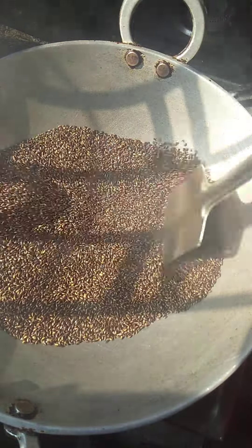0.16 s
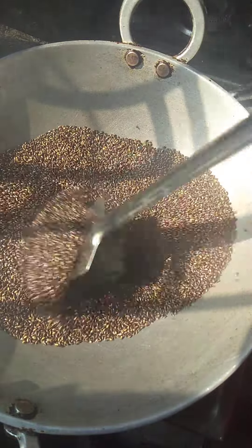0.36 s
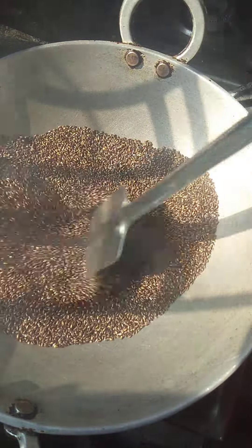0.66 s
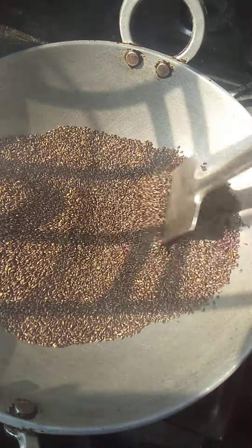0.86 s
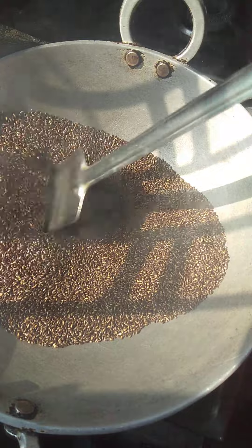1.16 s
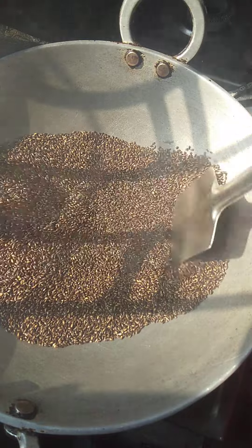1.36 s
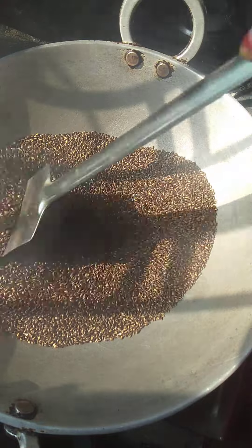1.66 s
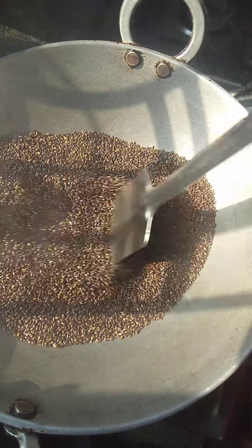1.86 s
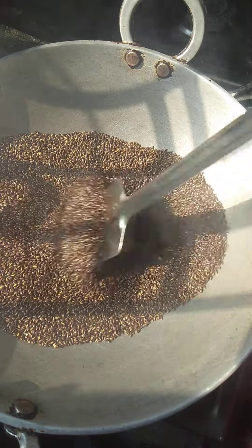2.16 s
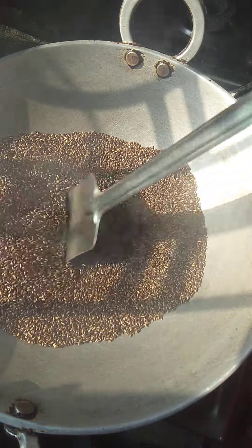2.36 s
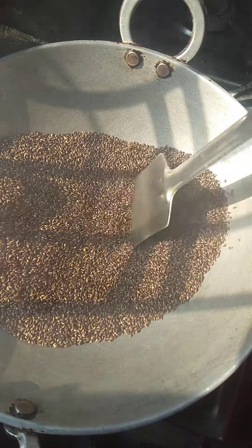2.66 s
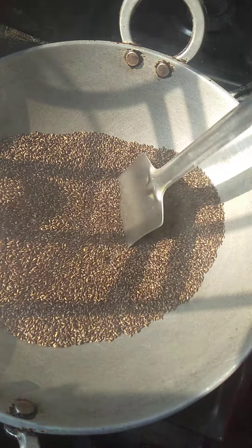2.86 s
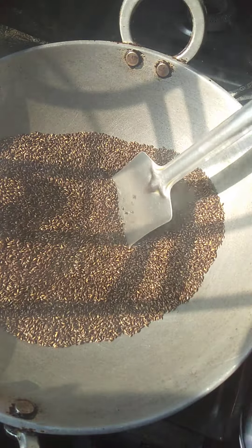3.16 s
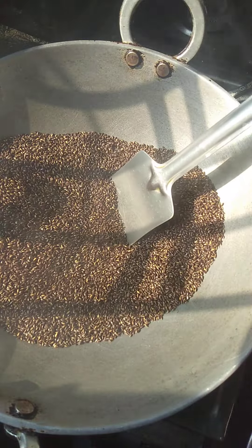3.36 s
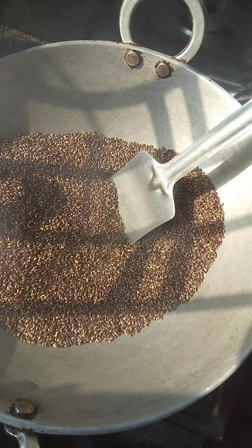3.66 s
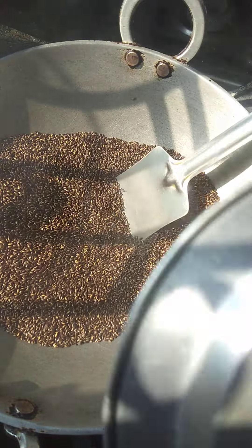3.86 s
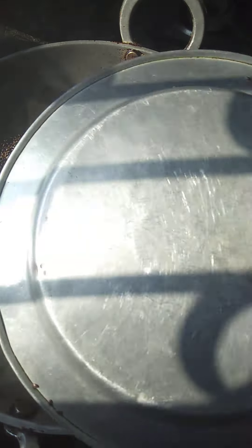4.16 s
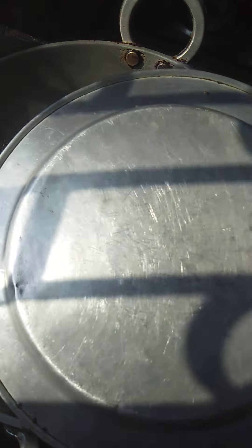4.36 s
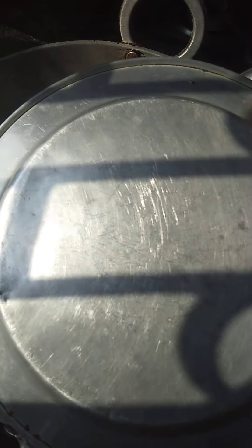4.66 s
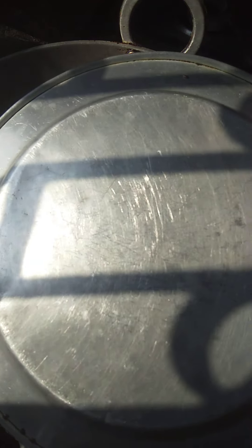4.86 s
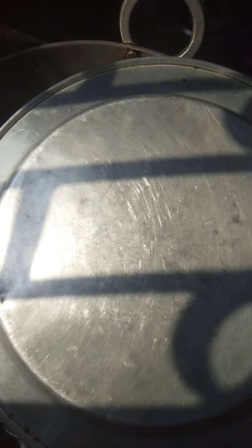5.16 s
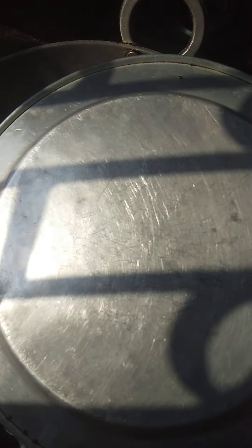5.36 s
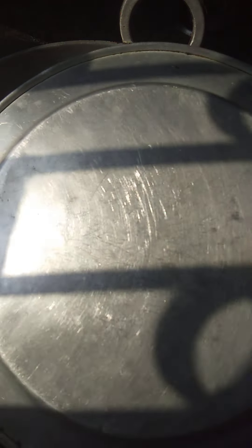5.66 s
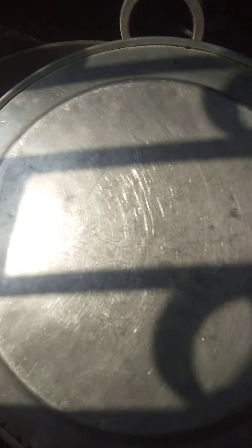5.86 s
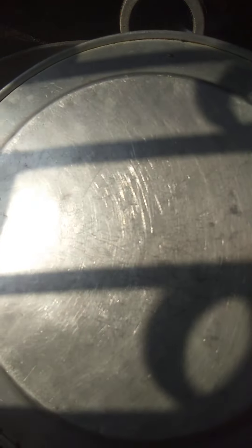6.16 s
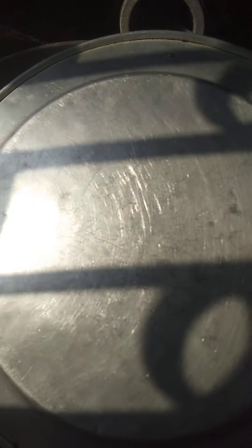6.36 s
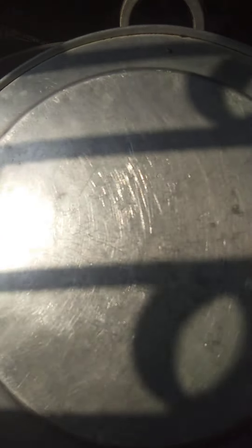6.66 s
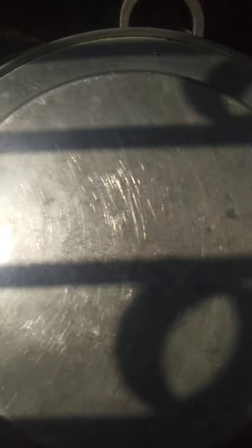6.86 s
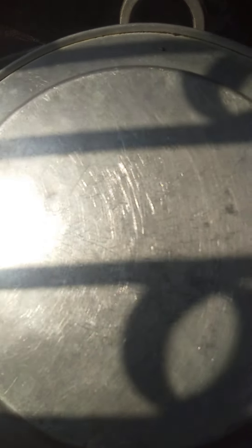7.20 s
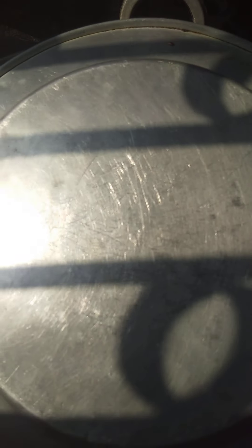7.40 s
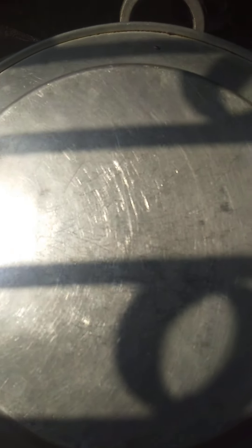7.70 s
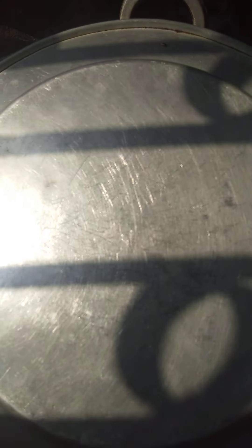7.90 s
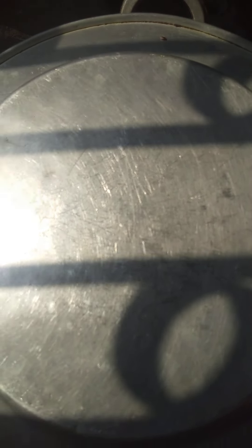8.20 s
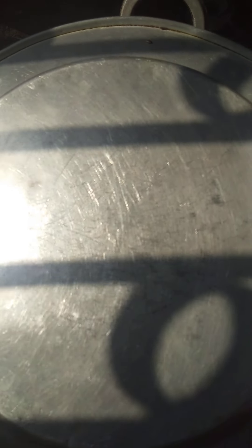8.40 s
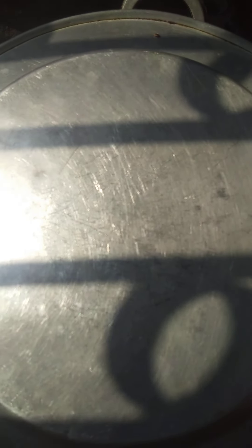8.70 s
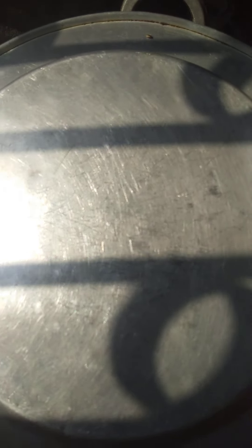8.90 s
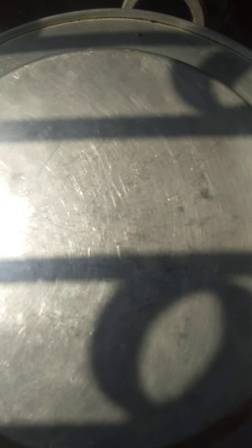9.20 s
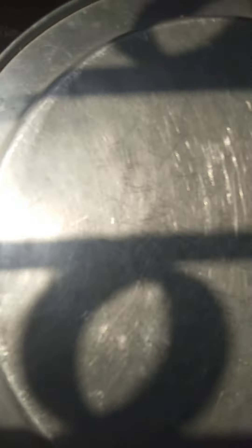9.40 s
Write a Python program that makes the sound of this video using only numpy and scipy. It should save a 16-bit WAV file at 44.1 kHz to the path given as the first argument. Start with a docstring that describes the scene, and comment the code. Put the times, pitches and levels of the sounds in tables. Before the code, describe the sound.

Seeds roast in a hot steel pan with a sputtering hiss and many sharp little pops. A metal spatula taps lightly, then scrapes across the pan with a loud knock. A loose metal lid goes on and clinks and slides on the rim several times, while the crackle continues beneath it, slightly softer and hollower. It is all heard from close by in a small, quiet kitchen.

```python
"""A sputtering sizzle, dotted with sharp ticks: flax seeds roast in a steel pan in a small, quiet kitchen.
Escaping steam hisses in short puffs, and each husk that splits sends out a brief pressure pulse.
A spatula knocks and scrapes the pan; then a loose lid clinks and slides on the rim. Impact and friction
drive the damped modes of the metal, and the space under the lid gives the crackle a hollow colour.
All is heard from close by, at the two microphone ports of a phone."""
import sys
import numpy as np
from scipy import signal
from scipy.fft import rfft, irfft, next_fast_len
from scipy.io import wavfile
from scipy.ndimage import uniform_filter1d, map_coordinates

SR = 44100
rng = np.random.default_rng(int(sys.argv[2]) if len(sys.argv) > 2 else 0)


def master_out(mix):
    """Clip the mix to full scale and print it as 16-bit PCM to the path in sys.argv[1]."""
    frames = np.transpose(np.atleast_2d(mix))
    ceiling = np.clip(frames, -1, 1)
    pcm = np.round(ceiling * 32767).astype(np.int16)
    wavfile.write(sys.argv[1], SR, pcm)


N = 420713

# steady sizzle of the seed bed: time_s, treble_db, body_db
SIZZLE_LEVELS = [(0, -48.5, -49.5), (2.2, -51.5, -56.5), (2.6, -43, -38), (3.2, -44, -40.5),
                 (3.9, -44.5, -46), (4.5, -48.5, -52), (6.4, -50, -53.5), (7, -43, -49), (8, -49, -49.5),
                 (9, -53, -49.5), (9.54, -47, -45)]
# puffs of steam: start_s, treble_db, t60_s
STEAM_PUFFS = [(0.036, -28.5, 0.086), (0.1, -22, 0.086), (0.154, -28, 0.16), (0.207, -26, 0.13),
               (0.264, -35, 0.13), (0.319, -26, 0.049), (0.343, -25.5, 0.042), (0.503, -28.5, 0.066),
               (0.547, -24.5, 0.05), (0.623, -31, 0.062), (0.68, -25.5, 0.062), (0.727, -40, 0.13),
               (0.8, -26, 0.1), (0.862, -28.5, 0.14), (0.936, -33.5, 0.25), (0.984, -24.5, 0.065),
               (1.022, -30, 0.12), (1.086, -21.5, 0.054), (1.108, -26, 0.11), (1.174, -29, 0.06),
               (1.224, -32.5, 0.16), (1.302, -27.5, 0.18), (1.332, -27.5, 0.17), (1.341, -6, 0.026),
               (1.41, -39, 0.11), (1.479, -29.5, 0.08), (1.514, -23, 0.056), (1.535, -25, 0.1),
               (1.606, -29.5, 0.16), (1.665, -27, 0.13), (1.736, -27, 0.08), (1.784, -25.5, 0.077),
               (1.818, -25.5, 0.066), (1.864, -27, 0.06), (1.929, -25, 0.066), (1.966, -21.5, 0.072),
               (1.998, -30.5, 0.1), (2.047, -31, 0.12), (2.12, -36, 0.18), (2.188, -30, 0.047),
               (2.244, -20.5, 0.036), (2.296, -22.5, 0.059), (2.326, -30.5, 0.065), (2.37, -24, 0.085),
               (2.445, -32, 0.065), (2.497, -25, 0.11), (2.546, -28.5, 0.15), (2.634, -22, 0.17),
               (2.713, -14.5, 0.051), (2.752, -29, 0.077), (2.787, -30, 0.15), (2.84, -35, 0.046),
               (2.868, -20, 0.11), (2.933, -22.5, 0.17), (3.04, -23.5, 0.057), (3.116, -19.5, 0.17),
               (3.235, -30, 0.081), (3.295, -17.5, 0.061), (3.318, -27.5, 0.2), (3.383, -30, 0.073),
               (3.437, -19, 0.1), (3.471, -26, 0.04), (3.519, -28, 0.038), (3.544, -19, 0.042),
               (3.608, -18, 0.14), (3.738, -21.5, 0.053), (3.787, -19.5, 0.1), (3.841, -21, 0.057),
               (3.874, -24.5, 0.083), (3.992, -35, 0.084), (4.037, -30.5, 0.055), (4.079, -23.5, 0.043),
               (4.134, -23, 0.063), (4.171, -28, 0.15), (4.257, -36, 0.14), (4.288, -26, 0.1),
               (4.345, -29, 0.09), (4.398, -24.5, 0.11), (4.53, -28.5, 0.061), (4.675, -34.5, 0.11),
               (4.721, -34, 0.085), (4.753, -26, 0.096), (4.79, -24.5, 0.13), (4.869, -30, 0.075),
               (4.905, -33, 0.11), (4.976, -35, 0.092), (5.055, -32, 0.37), (5.125, -34, 0.1),
               (5.221, -31, 0.07), (5.254, -31.5, 0.15), (5.316, -29.5, 0.19), (5.431, -26, 0.13),
               (5.59, -34, 0.056), (5.64, -30.5, 0.086), (5.749, -27, 0.13), (5.788, -30, 0.093),
               (5.834, -27.5, 0.15), (5.954, -37.5, 0.063), (6.033, -23.5, 0.084), (6.056, -23.5, 0.096),
               (6.082, -24, 0.074), (6.105, -32, 0.21), (6.211, -33.5, 0.079), (6.253, -28, 0.098),
               (6.312, -34.5, 0.33), (6.385, -39, 0.042), (6.451, -31, 0.2), (6.525, -30.5, 0.1),
               (6.565, -27, 0.066), (6.604, -33.5, 0.24), (6.692, -27, 0.11), (6.733, -28.5, 0.21),
               (6.798, -30, 0.11), (6.841, -37.5, 0.29), (6.935, -24.5, 0.13), (6.998, -28.5, 0.17),
               (7.062, -34.5, 0.26), (7.14, -30, 0.051), (7.217, -29, 0.12), (7.307, -25.5, 0.095),
               (7.339, -31, 0.11), (7.418, -28, 0.051), (7.461, -31.5, 0.24), (7.572, -22, 0.15),
               (7.66, -32.5, 0.18), (7.735, -27, 0.1), (7.805, -26, 0.17), (8.043, -34.5, 0.069),
               (8.088, -24.5, 0.12), (8.179, -32, 0.17), (8.226, -30.5, 0.14), (8.32, -24.5, 0.14),
               (8.397, -22.5, 0.11), (8.449, -28.5, 0.094), (8.524, -26, 0.15), (8.594, -32.5, 0.18),
               (8.751, -42.5, 0.06), (8.792, -36.5, 0.12), (8.841, -28, 0.18), (8.923, -29.5, 0.17),
               (9.015, -29.5, 0.14), (9.112, -26, 0.076), (9.15, -24, 0.17), (9.38, -19.5, 0.064),
               (9.419, -22, 0.071), (9.455, -30, 0.27)]
# spectrum of the hiss: frequency_hz, density_db
STEAM_SPECTRUM = [(350, -37), (600, -14.5), (748, -16), (1040, -25), (1640, -18.5), (1850, -10), (2870, -6),
                  (4280, -3.5), (4910, -2.5), (6200, 7), (6830, 5.5), (8500, -11.5), (13000, -2.5),
                  (15100, 2.5), (16000, -4.5)]
# balance of the hiss, left minus right: time_s, treble_db, body_db
STEAM_BALANCE = [(0.0, 8.5, 12.5), (0.6, 12, 4.5), (2.2, 10, 7), (4.2, 3, -2), (6.5, 7, 2), (7.2, 8.5, 0.5),
                 (9.54, 6, 2)]
# spectrum of the kitchen background: frequency_hz, density_db
KITCHEN_SPECTRUM = [(15, -42), (25, -37), (59, 3), (151, -0.5), (238, 5.5), (380, 7), (447, -1.5),
                    (608, -2), (897, -6), (1200, 5), (1560, -34), (2640, -120)]
# low rumble: time_s, level_db
RUMBLE_LEVELS = [(0.0, -68), (2.26, -70), (2.8, -56), (2.89, -37), (2.96, -56), (3.02, -40), (3.08, -61),
                 (3.14, -36.5), (3.3, -48), (3.59, -67), (5.55, -61), (6.27, -67.5), (6.75, -55),
                 (7.12, -58), (9.54, -64)]
# husks splitting: start_s, level_db, pitch_hz
HUSK_TICKS = [(0.0244, -20, 3900), (0.0479, -15, 6100), (0.058, -12, 4400), (0.0941, -18, 4000),
              (0.1122, -6, 2900), (0.1253, -16, 4900), (0.1341, -16, 3700), (0.1662, -11, 3800),
              (0.214, -13, 4500), (0.224, -15, 4200), (0.2348, -10, 3700), (0.2775, -15, 3800),
              (0.3236, -16, 4400), (0.3878, -22, 3600), (0.395, -18, 3700), (0.5071, -17, 4000),
              (0.443, -25, 3000), (0.5528, -18, 5700), (0.5625, -20, 3400), (0.6115, -24, 3700),
              (0.6461, -16, 3800), (0.6853, -18, 5400), (0.7973, -14, 4100), (0.8088, -15, 4500),
              (0.8185, -15, 4000), (0.8712, -12, 3800), (0.885, -14, 4400), (0.904, -15, 4000),
              (0.9438, -17, 3800), (0.9533, -17, 4200), (0.9755, -13, 3800), (0.9944, -14, 3800),
              (1.035, -14, 5200), (1.0441, -17, 3900), (1.0902, -17, 4000), (1.0965, -16, 4500),
              (1.1239, -13, 5300), (1.1449, -19, 2700), (1.2304, -18, 5100), (1.2388, -20, 3700),
              (1.3033, -12, 4300), (1.316, -12, 4700), (1.3452, -7, 4100), (1.4191, -15, 3800),
              (1.4921, -15, 4400), (1.5465, -14, 4100), (1.6166, -17, 5000), (1.6828, -16, 4900),
              (1.7471, -14, 4700), (1.7793, -18, 4900), (1.7951, -17, 4300), (1.871, -17, 5300),
              (1.9395, -8, 4000), (1.9628, -19, 3400), (1.9803, -11, 4600), (2.0131, -15, 4300),
              (2.0552, -18, 5600), (2.1282, -18, 3800), (2.1594, -17, 3900), (2.196, -15, 4300),
              (2.3091, -15, 5900), (2.3892, -11, 5400), (2.5264, -14, 4000), (2.5546, -10, 5700),
              (2.5685, -11, 3000), (2.6211, -10, 4200), (2.6343, -6, 3600), (2.6484, -6, 3900),
              (2.6667, -9, 3800), (2.7049, -10, 4300), (2.7587, -13, 4000), (2.7776, -15, 3500),
              (2.7928, -13, 3800), (2.8104, -9, 5800), (2.9483, -6, 3600), (2.9642, -6, 3600),
              (2.9814, -9, 4200), (3.0544, -11, 2600), (3.1205, -12, 3700), (3.1745, -9, 3600),
              (3.2431, -14, 4000), (3.3003, -9, 4700), (3.3215, -12, 3300), (3.329, -9, 4400),
              (3.3472, -15, 4500), (3.3889, -15, 3300), (3.4209, -20, 3800), (3.4423, -9, 5400),
              (3.4553, -9, 4500), (3.4577, -7, 5700), (3.526, -17, 4200), (3.5315, -18, 4500),
              (3.5497, -13, 3900), (3.5962, -15, 3600), (3.603, -14, 3400), (3.6292, -9, 4100),
              (3.6829, -13, 3600), (3.6957, -16, 4000), (3.7034, -10, 3700), (3.7421, -14, 4000),
              (3.7542, -17, 3700), (3.774, -17, 4400), (3.7973, -6, 5500), (3.817, -16, 4200),
              (3.8312, -11, 4200), (3.8537, -9, 4400), (3.8818, -12, 3900), (3.8889, -15, 5100),
              (3.9147, -15, 4500), (3.9391, -24, 3600), (3.9557, -20, 4400), (4.142, -14, 4200),
              (4.2908, -15, 3600), (4.3138, -14, 4500), (4.4016, -18, 4000), (4.7887, -17, 4600),
              (5.075, -17, 3600), (5.2739, -17, 3700), (5.8455, -12, 4400), (6.0399, -13, 4400),
              (6.068, -17, 4200), (6.0948, -16, 3700), (6.1008, -16, 4100), (6.1412, -21, 3800),
              (6.2226, -21, 3400), (6.3781, -18, 4000), (6.396, -21, 3800), (6.468, -20, 4000),
              (6.638, -21, 4000), (6.669, -22, 2600), (6.7029, -15, 4000), (6.9486, -13, 3900),
              (7.222, -18, 4500), (7.3112, -16, 3700), (7.5839, -18, 5200), (7.8028, -15, 3500),
              (7.907, -21, 3500), (8.3238, -14, 4700), (8.354, -17, 4500), (8.55, -17, 4200),
              (9.0631, -22, 2600), (9.2019, -12, 3900), (9.3857, -13, 5200), (9.5253, -8, 5100)]
# crackle bands of large, middling and small husks: low_hz, high_hz
HUSK_BANDS = [(1500, 6200), (2200, 6600), (3500, 5270)]
# faint low thumps as the microphone briefly overloads on loud peaks: centre_s, level_db
OVERLOAD_THUMPS = [(0.112, -41), (1.345, -41), (2.645, -42), (3.621, -41.5), (3.796, -44), (5.443, -35)]
# spatula on the pan: start_s, level_db, hardness_db, seed_damping_fraction, contact_hz
SPATULA_KNOCKS = [(0.902, -46, -10, 0.2, 3030), (0.968, -39.5, 5, 0.46, 3000), (1.715, -40.5, 3, 1, 3000),
                  (1.814, -28.5, -5.5, 0.74, 2980), (2.105, -35, 0.5, 0.68, 3000),
                  (2.407, -25.5, -6, 0.3, 3000), (2.824, -8, 5, 0.6, 2300), (2.875, -24, 1.5, 1, 1630),
                  (3.127, -15.5, 2, 0.58, 4160)]
# modes of the pan: pitch_hz, gain_db, base_t60_s
PAN_MODES = [(99, -28, 0.4), (165.4, -18, 1), (259, -10, 1), (339, 8.5, 0.15), (436, 8, 0.27),
             (446.5, 11, 0.07), (488, -1.5, 0.93), (575, -6, 0.3), (695, -23, 0.63), (881, 3, 0.36),
             (1027, 9, 0.088), (1225, 3, 0.048), (1560, -4.5, 0.23), (1690, -4, 0.11), (1830, -13, 0.18),
             (1970, -1, 0.06), (2407, -6.5, 0.15), (3070, -2, 0.079), (3660, -11, 0.16)]
# spatula dragged over the pan, one list a stroke: time_s, level_db, brightness_db
SPATULA_STROKES = [
    [(0.93, -69, -10), (0.97, -39.5, -12), (1.06, -61, -15)],
    [(1.8, -50, -20), (1.83, -45.5, -20), (1.93, -56, -20)],
    [(2.39, -55, -19), (2.415, -34.5, -16), (2.6, -30.5, -14), (2.8, -39.5, -12), (2.84, -35.5, 9),
     (3.1, -34.5, -5.5), (3.135, -36, -2), (3.35, -46.5, 0)],
]
# spectrum of the blade's rasp: frequency_hz, density_db
RASP_SPECTRUM = [(150, -53), (220, -4.5), (330, 6.5), (450, 1.5), (600, -3.5), (800, -5.5), (1050, -7),
                 (1400, -10.5), (2600, -66)]
# rough notes of the sliding blade, later the lid, one list a note: time_s, level_db, pitch_hz
METAL_GLIDES = [
    [(2.5, -40, 800), (2.78, -35, 518)],
    [(2.84, -40, 2200), (3.1, -44, 1700)],
    [(8.85, -54, 1620), (9.06, -54, 1520)],
    [(9.19, -54, 1530), (9.32, -55, 1760)],
]
# modes of the lid and the air under it: pitch_hz, gain_db, t60_s
CAVITY_MODES = [(638, -1, 0.024), (1100, -8, 0.02), (1368, -0.5, 0.022), (1537, -12, 0.048),
                (2333, -11.5, 0.035)]
# lid on the rim: start_s, level_db, hardness_db, hand_damping_fraction, contact_hz
LID_CLINKS = [(4.25, -41, 2, 0.8, 3600), (4.3547, -27, -0.5, 0.52, 1500), (4.5353, -26, -0.5, 0.1, 1490),
              (4.561, -18, -4.5, 0.4, 1050), (4.786, -39, -10, 0.4, 3600), (4.952, -29.5, 0, 0, 3630),
              (4.967, -22.5, -5.5, 0.43, 900), (5.332, -41, -5, 0.4, 3600), (5.4422, -16, 1.5, 0.86, 3680),
              (5.458, -26, 4, 0.85, 3560), (5.545, -26, -4, 0.3, 2380), (5.594, -28.5, -3.5, 0.95, 2320),
              (6.7672, -17, 3, 0.77, 3590), (6.791, -20.5, -2, 0.82, 2440), (6.877, -21.5, 2, 0.46, 3830),
              (6.9179, -21, 3, 0.64, 2340), (7.729, -31.5, 7, 1, 2680), (8.0935, -33, 10, 0.93, 1380),
              (8.188, -36.5, -12, 0.4, 2500), (8.4085, -23, 9, 1, 6450), (9.162, -35.5, 0, 0.47, 2400)]
# modes of the lid: pitch_hz, gain_db, base_t60_s
LID_MODES = [(219.5, -5.5, 0.37), (257.4, -1.5, 0.22), (306, 10.5, 0.068), (404.6, 8.5, 0.17),
             (449, 10.5, 0.09), (600, -5, 0.26), (893, 14, 0.3), (1040, 7, 0.2), (1096, -14.5, 0.12),
             (1360, -5, 0.19), (1630, -7.5, 0.096), (2300, -8.5, 0.024), (2934, -9, 0.041),
             (3590, -10, 0.025), (3770, -9, 0.02), (4100, -9, .02), (6190, -14.5, 0.087)]
# lid settling and sliding on the rim, one list a stroke: time_s, level_db, brightness_db
LID_STROKES = [
    [(4.55, -46, -13), (5.068, -50, -9), (5.2, -55, -8)],
    [(5.46, -36, -4), (5.48, -48.5, -24), (5.8, -48.5, -23)],
    [(6.78, -49, 13), (6.952, -39.5, -25), (7.15, -62, 0)],
    [(8.78, -74, 16), (8.86, -69, 16), (9.04, -69, 16), (9.1, -78, 16), (9.22, -70, 16), (9.33, -72, 14)],
]
# delay at the left port, which is further from the pan: time_s, lag_samples
LEFT_PORT_LAG = [(0, 4.1), (4, 5.84), (5, 13.7), (9.54, 13.9)]

PUFF_LEAD_S, PUFF_RISE_S, PUFF_SQUARENESS = 0.0085, 0.019, 2.5  # a puff starts before it stands out
BODY_DB, BODY_DB_PER_DB = -38.5, 0.8  # body of a -31.5 dB puff, and its growth with the treble
BODY_LATE_S = 0.0015  # the body of the hiss follows the first thin jet
TICK_DECAY_CYCLES, TICK_PAN_DB, TICK_LAG_S = 1.1, 3, .00005  # seeds lie all over: pan and lag scatter
CRACKLES_PER_S, CRACKLE_SCATTER_DB, CRACKLE_DB = 120, 4.5, -5  # in each husk band
MODE_SHIFT_PER_KHZ, MODE_SCATTER_DB = .003, 2.5  # each contact point shifts and weights the modes anew
LID_ON_S, LID_SHADE_DB, CAVITY_DB = 3.95, -2, -27
TAPS_PER_S, TAP_GAIN = 90, 0.69  # seeds thrown against the lid


def undb(db):
    """Amplitude ratio of a level in decibels."""
    return 10 ** (np.asarray(db) / 20)


def unit(x):
    """Normalisation to an RMS of one."""
    return x / np.sqrt(np.mean(x ** 2))


def curve(table):
    """Linear interpolation of each column in time."""
    times, *columns = np.transpose(table)
    return [np.interp(np.arange(N) / SR, times, column) for column in columns]


def band(x, lo_hz, hi_hz):
    """Band-pass filtering between two edges."""
    edges_hz = [lo_hz, min(hi_hz, .45 * SR)]
    return signal.sosfilt(signal.butter(2, edges_hz, "band", fs=SR, output="sos"), x)


def coloured(spectrum, lo_hz=0., hi_hz=np.inf):
    """Spectral shaping of white noise between two soft edges."""
    size = next_fast_len(N + N % 2, True)
    f = np.arange(1, size // 2 + 2) * SR / size
    hz, db = np.transpose(spectrum)
    shape = undb(np.interp(np.log(f), np.log(hz), db))
    edges = 1 / (1 + (lo_hz / f) ** 12) / (1 + (f / hi_hz) ** 12)
    return unit(irfft(rfft(rng.standard_normal(size)) * shape * edges, size)[:N])


def flicker(rate_hz):
    """Random modulation: Gaussian values joined by ramps."""
    hold = int(SR / rate_hz)
    return uniform_filter1d(np.repeat(rng.standard_normal(N // hold + 1), hold), hold)[:N]


def add(out, start_s, sound, pan_db=0.):
    """Superposition of a short signal on both rows; positive pan is to the left."""
    i = int(start_s * SR)
    n = min(sound.shape[-1], N - i)
    out[:, i:i + n] += sound[..., :n] * undb([[pan_db / 2], [-pan_db / 2]])


def ring(force, modes, tilt_db_per_octave=0.):
    """Forced vibration: each mode responds as a damped two-pole resonator."""
    out = 0
    for hz, db, t60 in modes:
        radius, angle = np.exp(-np.log(1000) / (t60 * SR)), 2 * np.pi * hz / SR
        response = signal.lfilter([.5, 0, -.5], [1, -2 * radius * np.cos(angle), radius ** 2], force)
        out = out + undb(db + tilt_db_per_octave * np.log2(hz / 500)) * response
    return out


def steam_envelopes():
    """Incoherent sources add in power: bed and puffs sum to the amplitudes of treble and body."""
    power = undb(2 * (np.array(curve(SIZZLE_LEVELS)) + 3 * flicker(12)))
    t = np.arange(SR // 3) / SR
    late_s = np.array([[0], [BODY_LATE_S]])
    swell = np.sin(np.pi / 2 * np.clip((t - late_s) / (PUFF_RISE_S - late_s), 0, 1)) ** 4
    for start_s, treble_db, t60 in STEAM_PUFFS:
        puff = swell * undb(-120 * (t / t60) ** PUFF_SQUARENESS)
        body_db = BODY_DB + BODY_DB_PER_DB * (treble_db + 31.5)
        add(power, start_s - PUFF_LEAD_S, puff * undb([[treble_db], [body_db]]) ** 2)
    return np.sqrt(power)


def steam_hiss(treble, body):
    """Jet noise: the steam sputters, and as each jet has its own colour, bands swell independently."""
    def jets(bands, pan_db):
        out = 0
        for lo_hz, hi_hz, power_share in bands:
            swell = undb(2.5 * flicker(44.33)) * np.sqrt(power_share)
            out = out + swell * np.array([coloured(STEAM_SPECTRUM, lo_hz, hi_hz) for _ in range(2)])
        return unit(out) * undb([pan_db / 2, -pan_db / 2])

    treble_pan_db, body_pan_db = curve(STEAM_BALANCE)
    treble_bands = [(8330, 14760, 0.32), (12700, np.inf, 0.67)]
    body_bands = [(0, 3500, 0.13), (3340, 5080, 0.59), (4970, 6770, 0.44)]
    high = treble * undb(2.2 * flicker(260)) * jets(treble_bands, treble_pan_db)
    return high + body * undb(4.2 * flicker(250)) * jets(body_bands, body_pan_db)


def kitchen(floor_db=-64.5):
    """Partly coherent background: a wavering floor and a rumble, mostly alike at both ports."""
    def independent_pair(lo_hz, hi_hz=np.inf):
        return np.array([coloured(KITCHEN_SPECTRUM, lo_hz, hi_hz) for _ in range(2)])

    floor = coloured(KITCHEN_SPECTRUM, 220) + .5 * independent_pair(104)
    rumble = coloured(KITCHEN_SPECTRUM, 72, 188) + .25 * independent_pair(20, 180)
    floor *= undb(floor_db + 3 * flicker(28))
    return floor + undb(curve(RUMBLE_LEVELS)[0] + 2.3 * flicker(13)) * rumble


def splitting_husks(body):
    """Sudden release: a husk radiates a pulse of a cycle or two; fainter crackle follows the steam."""
    ticks = np.zeros((2, N))
    for start_s, db, hz in HUSK_TICKS:
        pan, lag = rng.standard_normal(2)
        delay_s = np.maximum(TICK_LAG_S * lag * np.array([[1], [-1]]), 0)
        t = np.maximum(np.arange(SR // 200) / SR - delay_s, 0)
        pulse = -np.sin(2 * np.pi * hz * t) * np.exp(-t * hz / TICK_DECAY_CYCLES)
        add(ticks, start_s, undb(db) * pulse, TICK_PAN_DB * pan)
    sizes = undb(CRACKLE_SCATTER_DB * np.minimum(rng.exponential(size=N), 3)) * rng.choice([-1, 1], N)
    crackle = 0
    for lo_hz, hi_hz in HUSK_BANDS:
        splits = rng.random(N) < CRACKLES_PER_S / SR
        crackle = crackle + unit(band(splits * sizes, lo_hz, hi_hz))
    return 1.15 * band(ticks, 1200, 11000) + undb(CRACKLE_DB) * body * crackle


def overload_thumps(pulse_s=.004):
    """Brief microphone overload leaves a faint low thump: a one-sided pulse at each listed time."""
    out = np.zeros((2, N))
    for centre_s, db in OVERLOAD_THUMPS:
        add(out, centre_s - pulse_s / 2, undb(db) * np.hanning(int(pulse_s * SR)), pan_db=-4)
    return out


def metal_impacts(blows, modes):
    """Impact excitation: a blow and its rattle ring the modes; hardness brightens, damping shortens."""
    out, t = np.zeros((2, N)), np.arange(SR // 3) / SR
    for start_s, db, hardness_db, damping, contact_hz in blows:
        hardness_db = np.clip(hardness_db, -9, 9)
        struck_modes = []
        for hz, gain_db, t60 in modes:
            shift, weight = rng.standard_normal(2)
            shifted_hz = hz * (1 + MODE_SHIFT_PER_KHZ * shift * hz / 1000)
            struck_modes.append((shifted_hz, gain_db + MODE_SCATTER_DB * weight, t60 * (1.1 - damping)))
        force = rng.standard_normal(len(t)) * (np.exp(-t / 0.0029) + 0.2 * np.exp(-t / 0.064))
        force[0] = 14  # sharp first contact, ahead of the rattle
        ringing = ring(force, struck_modes, hardness_db)
        ringing /= np.abs(band(ringing, 200, 1200)).max()
        bite = ring(rng.standard_normal(len(t)) * np.exp(-t / 0.002), [(contact_hz, 0, .006)])
        bite /= np.abs(bite).max()
        add(out, start_s, undb(db) * (ringing + undb(hardness_db + 1) * bite))
    return out


def gate(stroke, ramp_s):
    """Trapezoidal envelope over the span of a stroke."""
    t = np.arange(N) / SR
    return np.clip(np.minimum(t - stroke[0][0], stroke[-1][0] - t) / ramp_s, 0, 1)


def drag(strokes, low, high):
    """Friction sounds only during motion; brightness weights its upper part."""
    out = np.zeros(N)
    for stroke in strokes:
        db, brightness_db = curve(stroke)
        out += gate(stroke, ramp_s=0.013) * undb(db) * (unit(low) + undb(brightness_db) * unit(high))
    return out


def spatula_scrape(slips, grit):
    """Stick-slip friction: the blade rasps and drives the damped modes of the pan."""
    pan_low = ring(grit, [(hz, db, .3 * t60) for hz, db, t60 in PAN_MODES if hz < 1100])
    pan_high = ring(grit, [(hz, db, .2 * t60) for hz, db, t60 in PAN_MODES if hz > 1100])
    rasp = slips * coloured(RASP_SPECTRUM, 150, 2600)
    return drag(SPATULA_STROKES, unit(rasp) + 0.78 * unit(pan_low), pan_high)


def metal_glides(width_hz=220):
    """Narrow-band noise about a moving pitch: the rough note of sliding metal."""
    out = np.zeros(N)
    for stroke in METAL_GLIDES:
        db, hz = curve(stroke)
        phase = 2 * np.pi * np.cumsum(hz) / SR
        note = flicker(width_hz) * np.cos(phase) + flicker(width_hz) * np.sin(phase)
        out += gate(stroke, ramp_s=0.022) * undb(db) * note
    return out


def lid_cavity(drive):
    """Cavity resonance: the hand-held lid shifts, so each hollow note comes and goes."""
    return sum(ring(undb(4.5 * flicker(14)) * drive, [mode]) for mode in CAVITY_MODES)


def seeds_under_lid(crackle, hiss, body):
    """Shielding and resonance: once on, the lid shades the crackle and rings with it, hiss and taps."""
    taps = unit((rng.random(N) < TAPS_PER_S / SR) * rng.standard_normal(N))
    covered = np.arange(N) / SR > LID_ON_S
    hollow = lid_cavity(covered * (crackle + .5 * hiss + TAP_GAIN * body * taps))
    return crackle * undb(LID_SHADE_DB * covered) + undb(CAVITY_DB) * hollow


def lid_slide(grit):
    """Friction on the rim drives the lid's damped low modes and the cavity under it."""
    lid_low = ring(grit, [(hz, db, .26 * t60) for hz, db, t60 in LID_MODES if hz < 1100])
    return drag(LID_STROKES, lid_low, lid_cavity(grit))


def reflections(x, lo_hz, hi_hz, t60_s, wet_db, places, hold_s=.012):
    """Multipath: bowl and walls add a diffuse tail for each port and each place the sound hops to."""
    t, hold, wet = np.arange(SR // 8) / SR, int(hold_s * SR), 0
    place = np.repeat(rng.integers(places, size=N // hold + 1), hold)[:N]
    decay = undb(-60 * t / t60_s) * (t > .0004)
    for k in range(places):
        tail = band(rng.standard_normal((2, len(t))), lo_hz, hi_hz) * decay
        tail /= np.sqrt(np.sum(tail ** 2, axis=1, keepdims=True))
        wet = wet + signal.oaconvolve(x * (place == k), tail, axes=1)[:, :N]
    return x + undb(wet_db) * wet


def scene():
    """Superposition at two ports; the longer path delays the pan's sound on the left."""
    treble, body = steam_envelopes()
    crackle = splitting_husks(body)
    hiss = steam_hiss(treble, body)
    seeds = seeds_under_lid(crackle, hiss, body)
    impacts = metal_impacts(SPATULA_KNOCKS, PAN_MODES) + metal_impacts(LID_CLINKS, LID_MODES)
    slips = undb(4 * flicker(300) + 2 * flicker(34))  # dense, uneven slips of metal on metal
    grit = slips * rng.standard_normal(N)
    metal = band(impacts + spatula_scrape(slips, grit) + lid_slide(grit) + metal_glides(), 85, 16000)
    seeds = reflections(seeds, 780, 4000, t60_s=0.039, wet_db=-13, places=3)
    metal = reflections(metal, 740, 7100, t60_s=0.078, wet_db=-2.5, places=2)
    left, right = seeds + metal + hiss
    left = map_coordinates(left, [np.arange(N) - curve(LEFT_PORT_LAG)[0]], order=3)
    return np.array([left, right]) + overload_thumps() + kitchen()


def record(dry):
    """Saturation and band limiting: the phone rounds the loudest peaks and cuts the top steeply."""
    return signal.sosfilt(signal.ellip(10, .3, 80, 15600, fs=SR, output="sos"), np.tanh(dry))


dry = scene()
out = record(dry)
master_out(out)
```